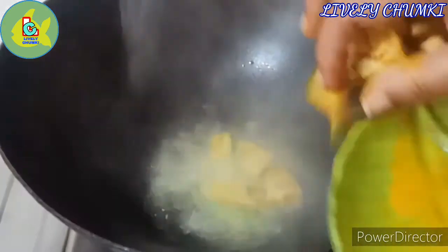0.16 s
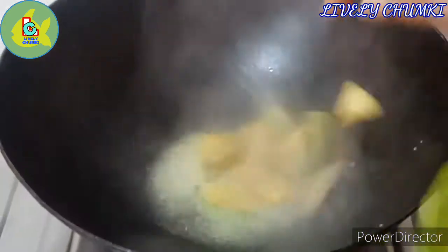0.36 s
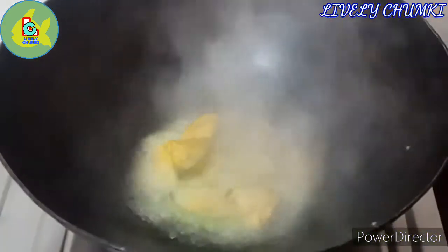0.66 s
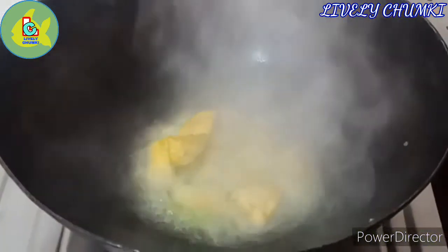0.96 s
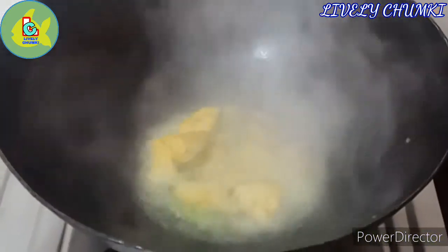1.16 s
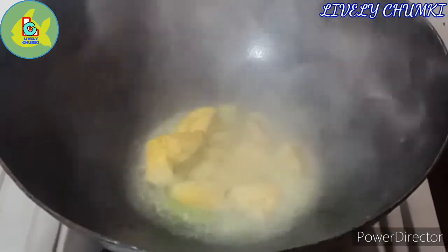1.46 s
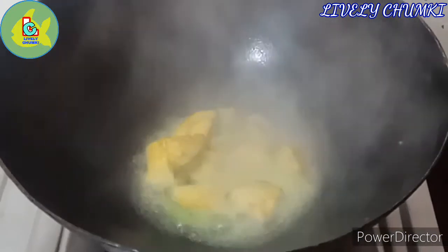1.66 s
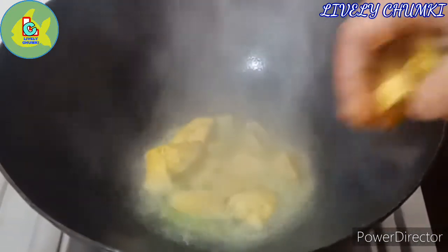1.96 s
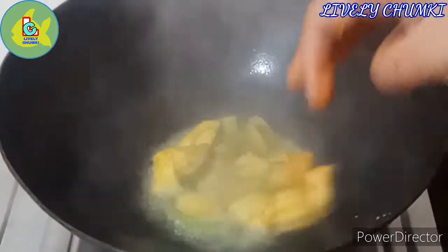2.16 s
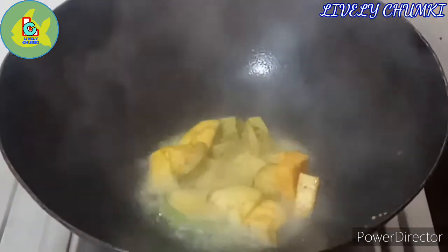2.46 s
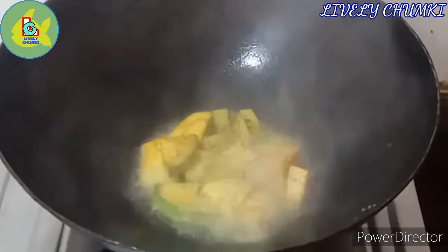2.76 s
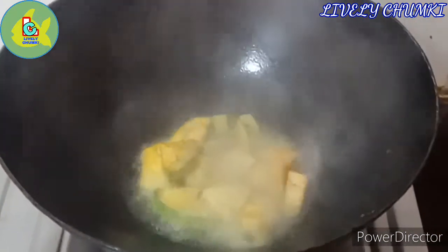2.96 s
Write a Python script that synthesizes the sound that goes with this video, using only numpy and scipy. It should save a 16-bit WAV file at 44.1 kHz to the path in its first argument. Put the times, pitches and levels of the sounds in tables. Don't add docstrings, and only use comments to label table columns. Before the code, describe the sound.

Continuous frying hiss with a faint metallic ring from the wok, over very quiet burner rumble and soft worktop thumps; a hollow bowl tap with quick bounces, then a splashy sizzle burst, captured close by phone.

```python
import sys
import numpy as np
from scipy import signal
from scipy.fft import rfft, irfft
from scipy.io import wavfile
from scipy.ndimage import uniform_filter1d

SR = 44100
rng = np.random.default_rng(int(sys.argv[2]) if len(sys.argv) > 2 else 0)


def unload_wav(signal):
    wavfile.write(
        sys.argv[1],
        SR,
        np.round(np.clip(np.atleast_2d(signal).T, -1, 1) * 32767).astype(np.int16),
    )


def decibels_to_gain(level_db):
    exponent = np.asarray(level_db, float) / 20
    return 10 ** exponent


N = 136710
TIME = np.arange(N) / SR
HZ = np.arange(N // 2 + 1) * SR / N + 1e-3


def curve(points):
    p = np.array(points, float)
    return np.interp(np.log(HZ), np.log(p[:, 0]), p[:, 1])


def colour(x, gain):
    return irfft(rfft(x) * gain, N)


def unit(x):
    return x / np.sqrt(np.mean(x ** 2))


def walk(rate):
    hold = int(SR / rate)
    held = rng.standard_normal(400)[np.arange(N) // hold % 400]
    smooth = uniform_filter1d(uniform_filter1d(held, hold), hold)
    return unit(smooth - uniform_filter1d(smooth, 4 * hold))


def bursts():
    pops_per_s, spread_db, cap_db, pop_db = 3000, 3.0, 9, -6
    popping = rng.random(N) < pops_per_s / SR
    size_db = np.minimum(spread_db * rng.exponential(size=N), cap_db)
    pops = popping * decibels_to_gain(size_db) * rng.choice([-1, 1], size=N)
    return unit(rng.standard_normal(N) + decibels_to_gain(pop_db) * unit(pops))


def pair(make):
    # frequency in Hz, shared power from 0 to 1.
    alike = [(100, 0.77), (450, 0.72), (800, .5), (1300, 0), (2200, 0.28), (3000, 0), (5700, 0.45),
             (7000, 0)]
    lag_s = 4.5e-5
    share = np.clip(curve(alike), 0, 1)
    shared = rfft(make()) * np.sqrt(share)
    late = np.exp(-2j * np.pi * HZ * lag_s)
    return np.array([shared * delay + rfft(make()) * np.sqrt(1 - share) for delay in (late, 1)])


def frying():
    # time in seconds, level in dB, brightness in dB, fullness in dB.
    vigour = [(0, -22.5, -2, 3), (.07, -24.5, -2, -5), (.09, -27.5, 2, 1), (.12, -24, -1, -4),
              (.3, -24, 2, 3), (.5, -24, 1.5, 2), (.56, -22.5, 0.5, -3.5), (.66, -23.5, 3, -2.5),
              (.95, -23, 2, -1), (1.16, -22.5, 2, -2), (1.2, -26, 4.5, 2.5), (1.3, -23.5, 1.5, -1),
              (1.7, -23.5, 1.5, 1), (2.18, -24.5, 1.5, 2), (2.36, -23.5, 0.5, 1), (2.48, -25, 3, 2),
              (2.8, -25.5, 4, 1), (3.1, -24.5, 3.5, -0.5)]
    # frequency in Hz, level in dB.
    steam = [(150, -22), (480, -23.5), (600, -16.5), (1500, -11), (2500, -5), (4000, 0), (5000, 1),
             (16000, -1)]
    # frequency in Hz, width in
    # Hz, peak in dB.
    resonances = [(521, 8.3, 11), (656.4, 10.6, 11), (750, 75, 0), (884, 28, 6.5), (1019, 10, 5), (1112, 8.3, 9),
                  (1460, 17, 4.5), (1845, 17, 7), (2915, 40, 6), (4780, 16, 6.5), (5571, 25, 3.5), (6730, 77, 5),
                  (15100, 940, 6), (15530, 210, 6)]
    # frequency in Hz, gain in dB.
    left_port = [(300, -2), (5000, 0.5), (6700, -3), (8100, -6.5), (11800, -3), (13000, -4), (13900, -3),
                 (14600, -3.5)]
    right_port = [(1500, 0), (5000, 3), (6400, 12.5), (8000, -5.5), (10000, -14.5), (11000, -10.5),
                  (13900, -6.5), (14600, 0.5)]
    surge_db, surge_per_s = 0.25, 70
    flicker_db, top_flicker_db, flicker_per_s = 0.7, 0.6, 60
    gain_db = 4.5

    rows = np.array(vigour, float)
    level, bright, full = (np.interp(TIME, rows[:, 0], rows[:, k]) for k in (1, 2, 3))
    ring = 1 + sum((decibels_to_gain(db) - 1) / (1 + (2 * (HZ - hz) / width) ** 2) for hz, width, db in resonances)
    ports = decibels_to_gain([curve(left_port), curve(right_port)])
    hiss = pair(bursts) * decibels_to_gain(curve(steam)) * ring * ports
    hiss = hiss / np.sqrt(np.mean(irfft(hiss, N) ** 2))

    octave = np.clip(np.log2(HZ / 125), 0, 7)
    surge = surge_db * walk(surge_per_s)
    out = 0
    for step in np.arange(15):
        band = np.clip(1 - np.abs(2 * octave - step), 0, 1)
        high = np.clip((step - 11) / 3, 0, 1)
        low = np.clip((8 - step) / 4, 0, 1)
        flicker = (flicker_db + high * top_flicker_db) * walk(flicker_per_s)
        out = out + irfft(hiss * band, N) * decibels_to_gain(surge + flicker + high * bright + low * full)
    return out * decibels_to_gain(level + gain_db)


def burner_rumble():
    # frequency in Hz, level in dB.
    tone = [(35, -18.5), (50, -14), (75, -13), (108, 8), (140, -1.5), (160, -15), (300, -13.5),
            (500, -24.5)]
    noise = pair(lambda: rng.standard_normal(N)) * decibels_to_gain(curve(tone))
    return unit(irfft(noise, N)) * decibels_to_gain(-66 + 1.6 * walk(5.15))


def thumps():
    # start in seconds, peak in dB, pitch in Hz.
    pushes = [(0.022, -50.5, 94), (0.116, -44, 101.6), (.225, -53, 95), (.34, -49, 103),
              (0.459, -53.5, 124), (1.039, -53, 130), (1.392, -50, 98), (1.58, -55, 104), (1.72, -60, 101),
              (1.812, -47, 101), (1.94, -54, 109), (2.058, -48.5, 104), (2.142, -49.5, 105),
              (2.228, -50, 113), (2.275, -44.5, 120), (2.35, -47, 104), (2.575, -53.5, 102),
              (2.68, -66.5, 99), (2.761, -50.5, 139), (2.83, -55, 130), (2.904, -51, 113),
              (2.961, -61.5, 99)]
    rise_s, t60_s, rattle_db, rattle_hz = 0.008, 0.25, -7, 254
    rattle_band = 1 / (1 + ((HZ - rattle_hz) / 90) ** 2)
    rattle = unit(colour(rng.standard_normal(N), rattle_band))
    out = 0
    for start, db, hz in pushes:
        since = np.maximum(TIME - start, 0)
        swell = (1 - np.exp(-since / rise_s)) ** 2 * decibels_to_gain(db + 5 - 60 * since / t60_s)
        out = out + swell * (np.sin(2 * np.pi * hz * since) + decibels_to_gain(rattle_db) * rattle)
    return out


def bowl_knock():
    # start in seconds, peak in dB.
    taps = [
        (.2605, -27),
        (0.273, -33),
        (.2860, -37.5),
    ]
    # frequency in Hz, level in dB, T60 in seconds.
    modes = [(273, -11, 0.16), (396, -3.5, 0.084), (596, -3, 0.11), (690, 4.5, 0.032), (793, 0, 0.044),
             (900, -11, 0.069), (1007, -2, 0.077), (1100, -21, .1)]
    out = 0
    for start, db in taps:
        since = np.maximum(TIME - start, 0)
        ring = sum(decibels_to_gain(gain - 60 * since / t60) * np.sin(2 * np.pi * hz * since)
                   for hz, gain, t60 in modes)
        out = out + decibels_to_gain(db) / 2 * ring
    return colour(out, 1 / (1 + (230 / HZ) ** 4))


def splash():
    # start in seconds, level in dB.
    landings = [
        (.545, -22),
        (2.3, -35),
    ]
    centre_hz, width_hz, rise_s, t60_s = 4500, 900, 0.0086, 0.97
    band = np.exp(-0.5 * ((HZ - centre_hz) / width_hz) ** 2)
    spit = unit(irfft(pair(bursts) * band, N))
    swell = 0
    for start, db in landings:
        since = np.maximum(TIME - start, 0)
        swell = swell + (1 - np.exp(-since / rise_s)) * decibels_to_gain(db - 60 * since / t60_s)
    return spit * swell


def scene():
    return frying() + burner_rumble() + thumps() + bowl_knock() + splash()


def mute_weak_bands(x):
    # frequency in Hz, power density in dB per Hz.
    threshold = [(2300, -88), (2650, -73), (3300, -70.5), (3900, -76), (7400, -84), (8300, -75.5),
                 (10000, -81), (13000, -78)]
    wobble_db, top_hz = 5, 14000
    f, _, z = signal.stft(x, SR, nperseg=2048, scaling="psd")
    cells = np.abs(z[:, :1024]).reshape(2, 128, 8, -1) ** 2
    power = uniform_filter1d(cells.mean(axis=2), size=3, axis=-1)
    loud = power.mean(axis=(0, 1))
    power = power * loud.mean() / (loud + 1e-12)
    wobble = uniform_filter1d(rng.standard_normal(power.shape[1:]), size=3, axis=-1) * np.sqrt(3)
    p, hz = np.array(threshold, float), f[4:1024:8]
    line = np.interp(np.log(hz), np.log(p[:, 0]), p[:, 1], left=-200)[:, None] + wobble_db * wobble
    is_open = (power > decibels_to_gain(2 * line)) | (hz > top_hz)[:, None]
    z[:, :1024] *= np.repeat(is_open, 8, axis=1)
    return signal.istft(z, SR, nperseg=2048, scaling="psd")[1][:, :N]


def roll_off(x):
    return signal.sosfilt(signal.butter(12, 16870, fs=SR, output="sos"), x)


def record(dry):
    top_hz = 15500
    cut = np.array([colour(port, HZ < top_hz) for port in mute_weak_bands(dry)])
    return roll_off(cut)


dry = scene()
out = record(dry)
unload_wav(out)
```